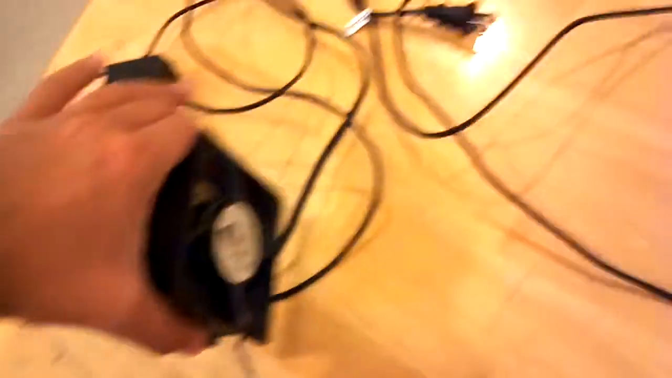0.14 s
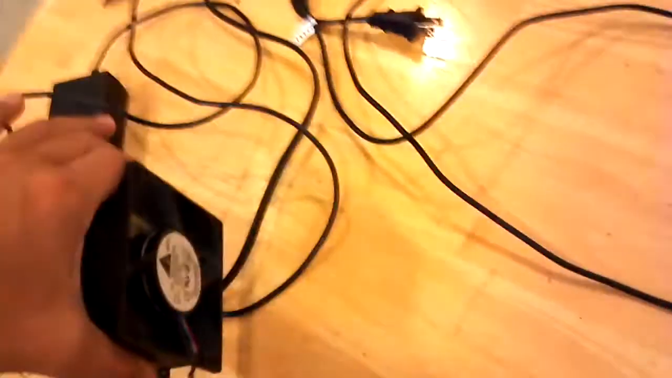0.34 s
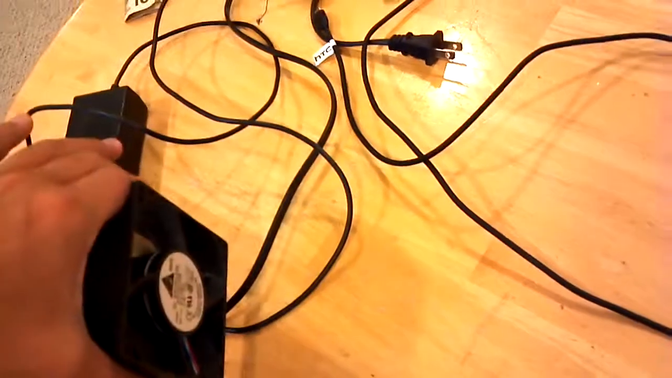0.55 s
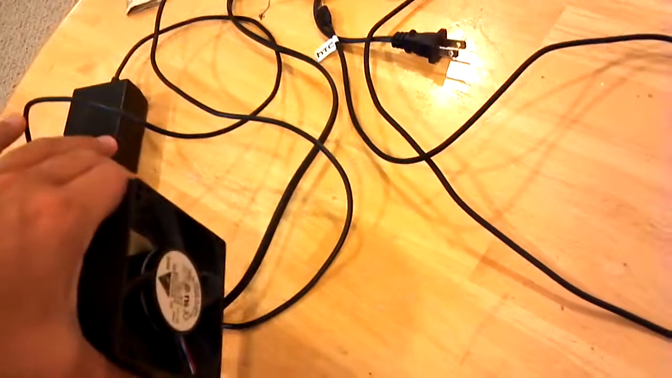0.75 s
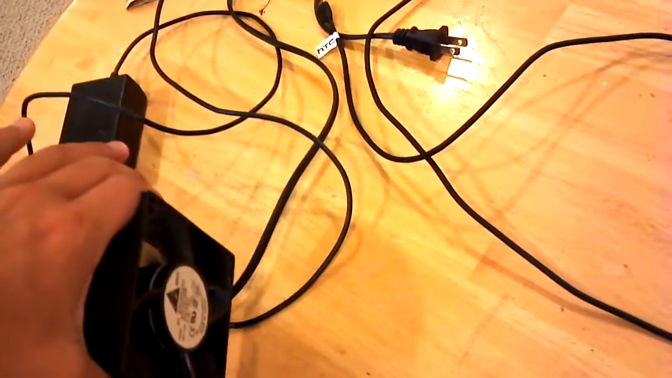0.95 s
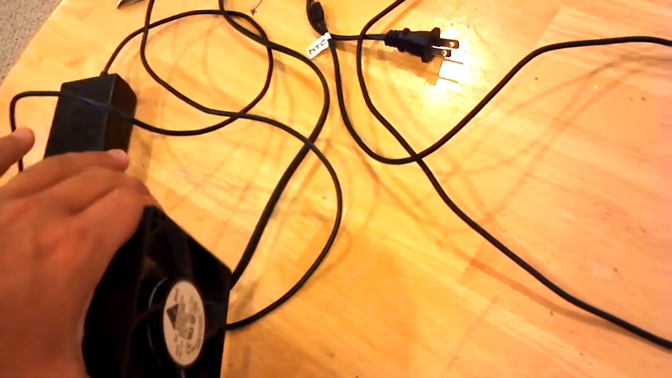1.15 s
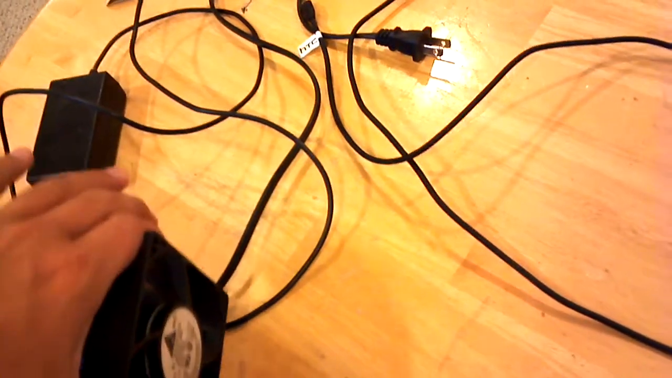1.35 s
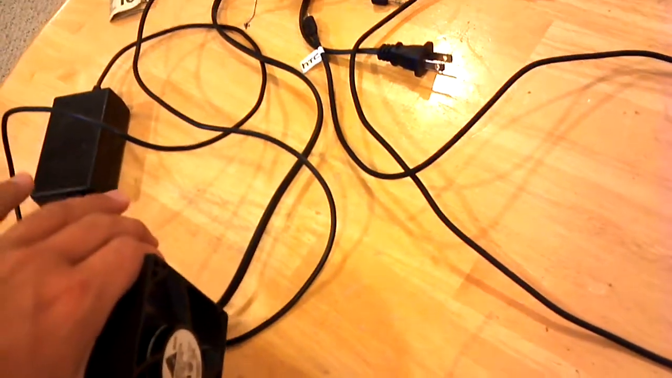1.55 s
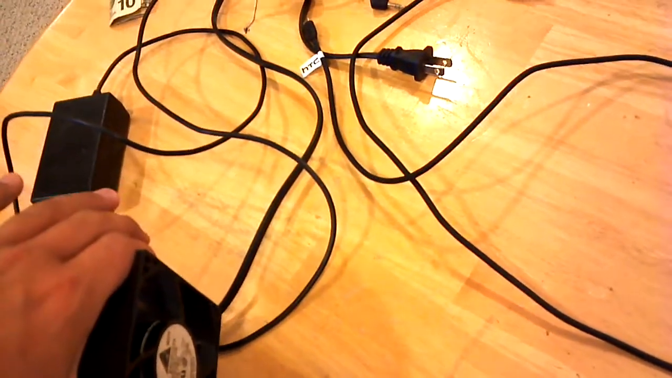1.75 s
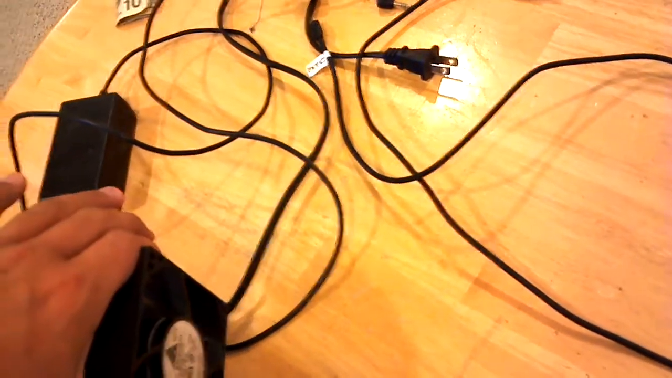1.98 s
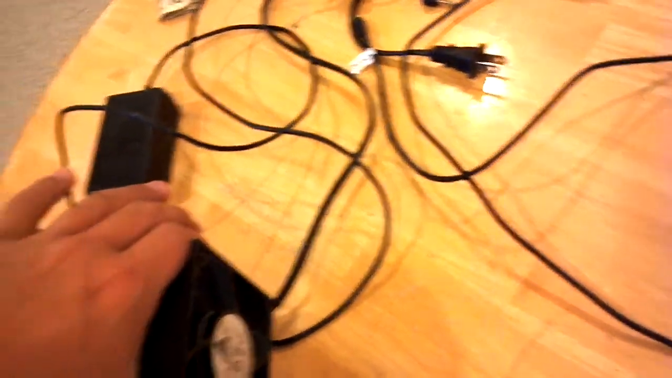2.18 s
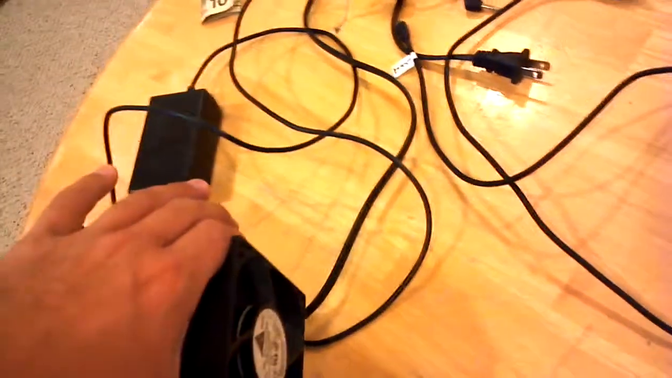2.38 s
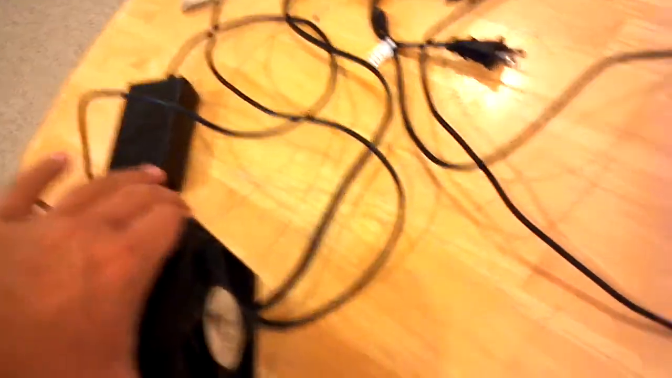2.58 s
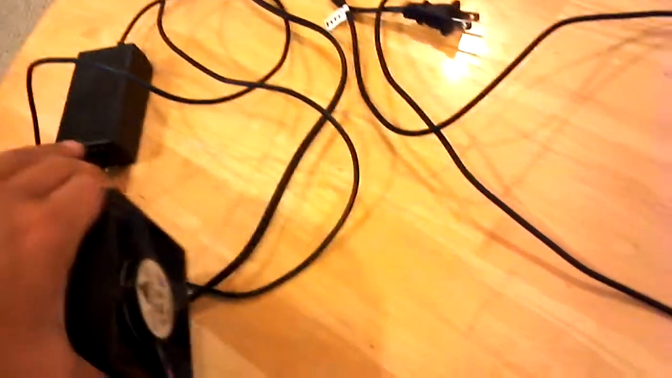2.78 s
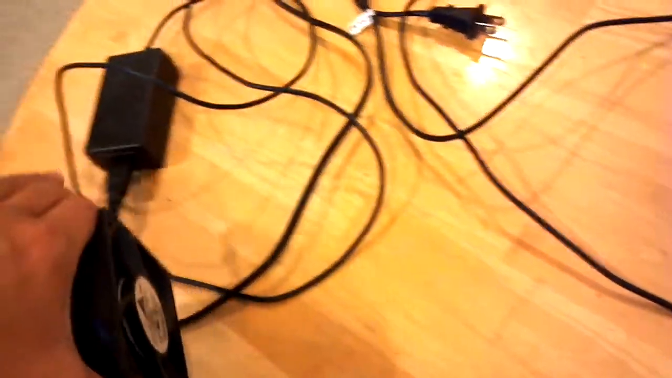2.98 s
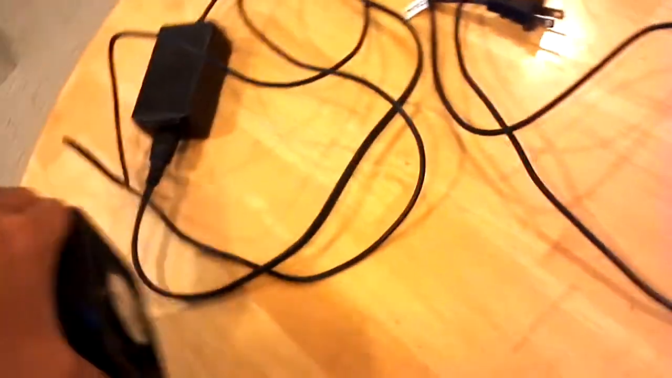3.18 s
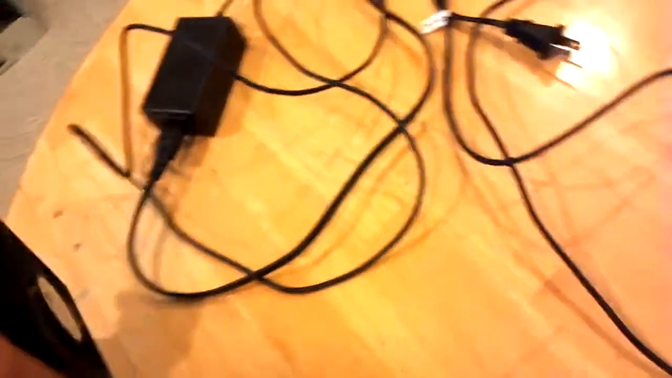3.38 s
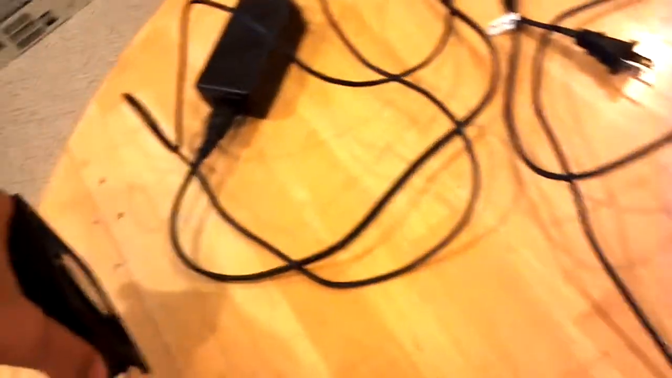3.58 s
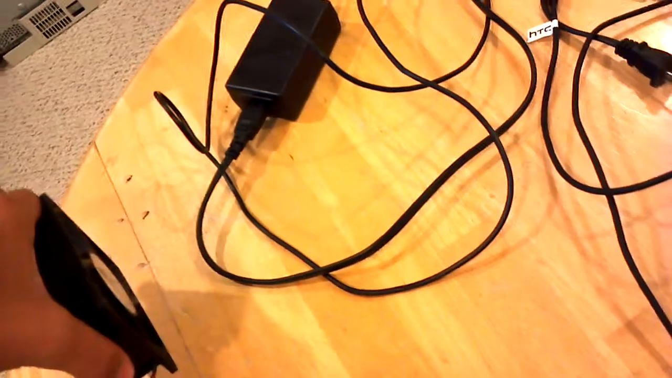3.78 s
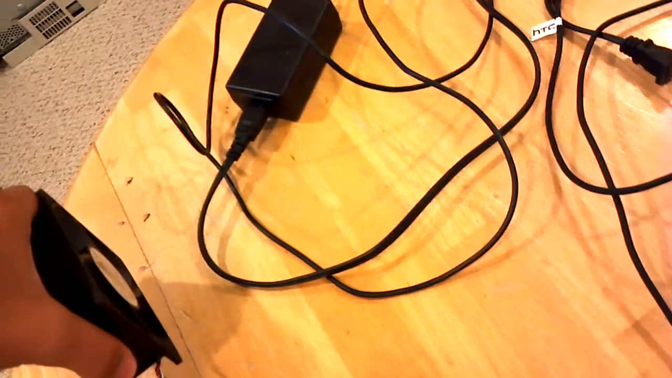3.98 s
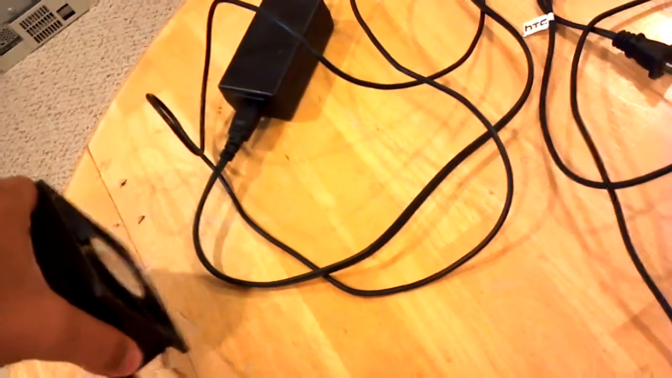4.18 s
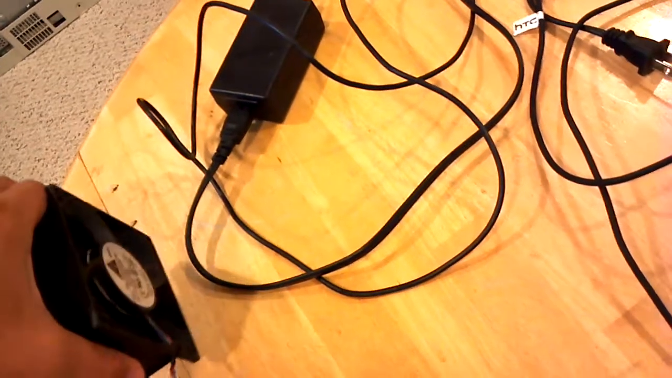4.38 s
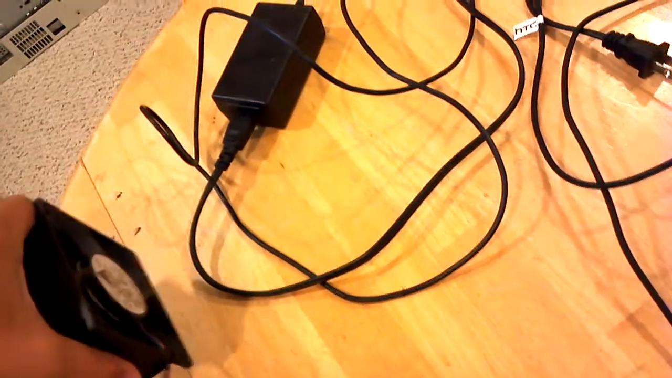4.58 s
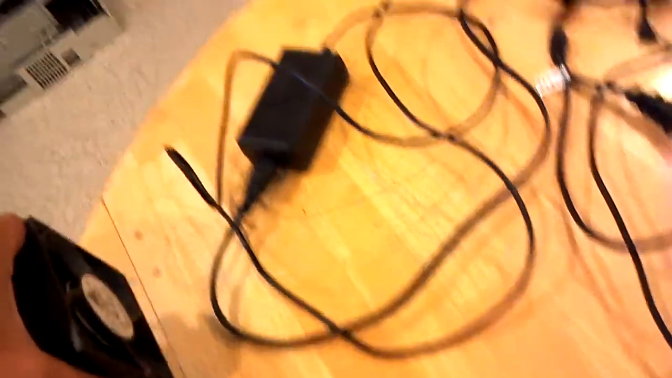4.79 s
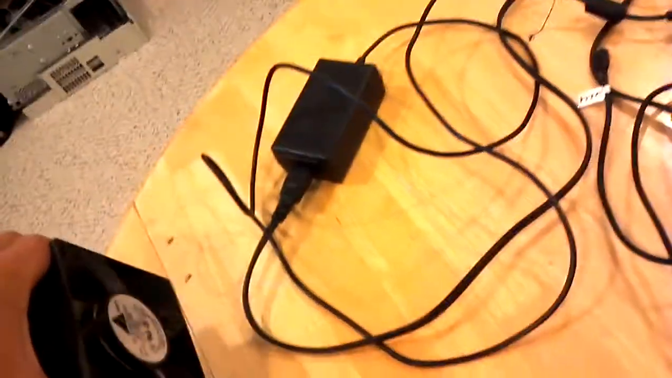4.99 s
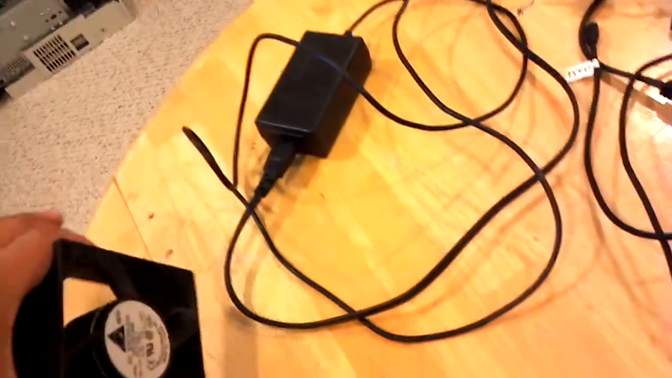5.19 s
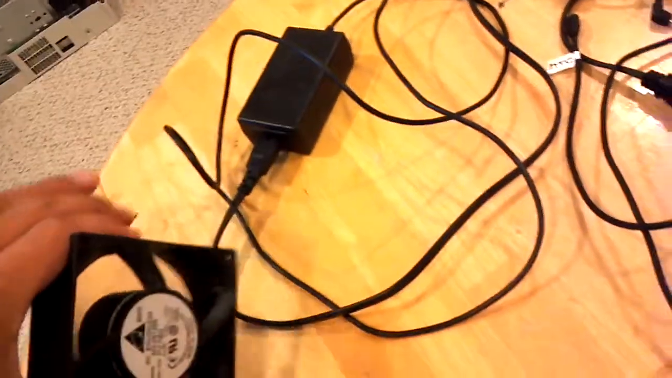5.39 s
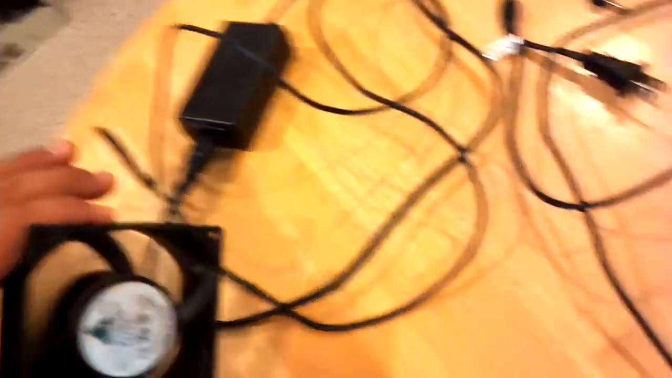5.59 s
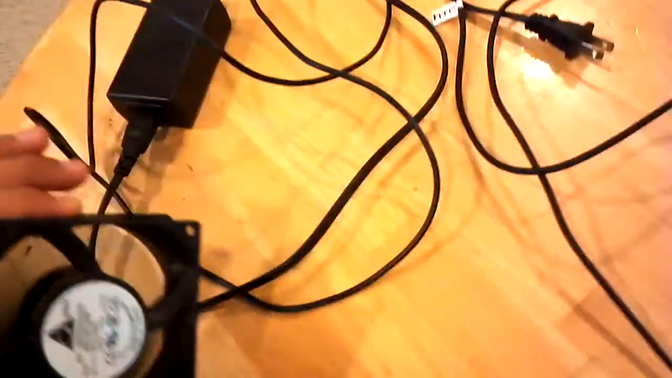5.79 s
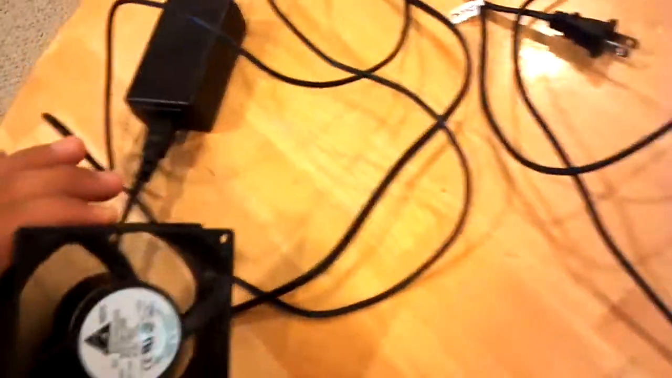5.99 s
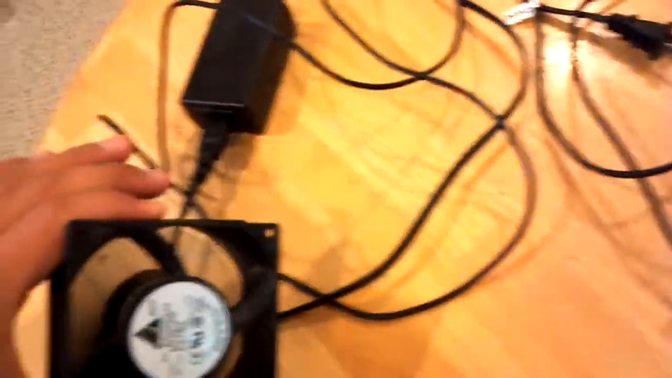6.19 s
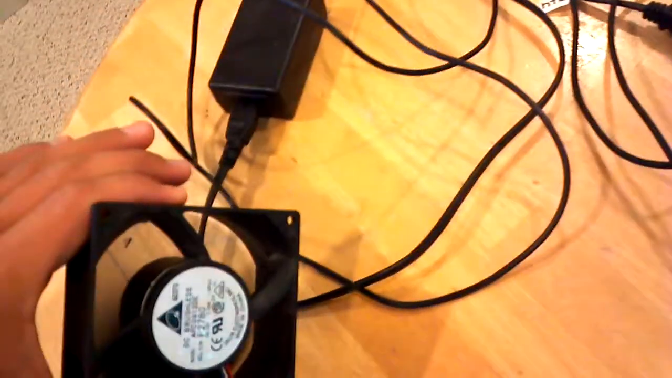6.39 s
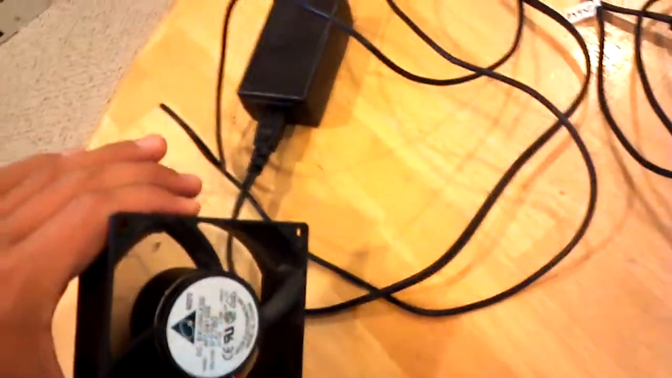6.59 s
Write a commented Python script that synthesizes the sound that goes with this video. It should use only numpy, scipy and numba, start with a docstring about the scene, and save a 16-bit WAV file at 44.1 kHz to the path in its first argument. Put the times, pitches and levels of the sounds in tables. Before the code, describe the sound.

A small electric cooling fan, held close to the microphone in a quiet room, is spinning up from the start. A soft rush of air and a humming whine climb steadily in pitch and loudness. In the first half second there is a very faint, very high rising electronic whistle and one tiny plastic tick. The fan's tones swell and dip as they rise, reaching full speed at about 3.5 seconds, then holding a high, wavering whine over strong rushing air. From about 3 seconds a thin, narrow hiss joins, leaning left. At about 5.7 seconds the fan is turned and its airflow strikes the microphone, bringing irregular gusts of low rumble, dull slaps and sharp crackle. This buffeting is the loudest part, thickening from 6 seconds and pushing the fan's whine down in level, and it continues until the end at about 6.6 seconds.

```python
"""A small nine-blade cooling fan, hand-held over a table, spins up with a faint rising coil whine
and one plastic tick. Over rushing air its tones swell and dip as they climb through resonances, then
waver at full speed; from about 3 s a narrow hiss beams at the recorder's left port. At 5.7 s the fan
is turned so that its jet buffets that port with rumble, slaps and crackle, and the gain control ducks.
Throughout, the recorder widens its stereo by subtracting from each port a late copy of the other."""
import sys
import numpy as np
from scipy import signal
from scipy.fft import rfft, irfft, next_fast_len
from scipy.io import wavfile
from scipy.ndimage import uniform_filter1d
from numba import njit

SR = 44100
rng = np.random.default_rng(int(sys.argv[2]) if len(sys.argv) > 2 else 0)


def store_pcm(level_fs):
    """Save levels as 16-bit WAV."""
    pcm = np.round(np.clip(level_fs, -1, 1) * 32767).astype(np.int16)
    wavfile.write(sys.argv[1], SR, np.atleast_2d(pcm).T)


N = 293265

# path from fan to ports: (frequency [Hz], left minus right [dB], left lead [rad], likeness [0-1])
PORT_PATH = [(60, 0.5, 0.023, 0.79), (475, -4, 0.198, 0.98), (1000, -8, 0.81, 0.77),
             (1430, -5.5, 1.38, 0.1), (1685, -5, 3.53, 0.07), (2675, -2, 2.84, 1), (2920, 3, 6.63, 0.31),
             (4230, 3, 10.17, 0.06), (7100, 7.5, 13.95, 0.32), (16100, 4.5, 21, 0)]
# room tone colour: (frequency [Hz], level [dB])
ROOM_EQ = [(60, -17.5), (120, -1), (300, -1), (700, -42), (1100, -3.5), (2500, -11), (6000, -43),
           (16000, -30)]
# plastic tick: (time [s], level [dB], modes (frequency [Hz], level [dB], t60 [s]))
FRAME_TICK = (.3153, -42, [(3900, -5, .008), (5100, -4, .008), (9600, -6, .008)])
# fader of the narrow hiss: (time [s], level [dB])
HISS_FADER = [(2.7, -58), (3.1, -42.5), (3.45, -33.5), (4.1, -33.5), (4.65, -32), (4.95, -36), (5.4, -41.5),
              (5.7, -33)]
# glide of the drive coil: (time [s], pitch [Hz], level [dB])
COIL_GLIDE = [(0, 12150, -69), (.2, 12600, -68), (.35, 13400, -65), (.47, 14400, -62), (.53, 15150, -59),
              (.58, 15900, -64), (.64, 16800, -68)]
# the drive ramps the shaft up, then it settles: (time [s], shaft speed [Hz])
SPIN_UP = [(0, 49.5), (.5, 56.4), (1.0, 64.1), (2.0, 79.8), (3.0, 95.85), (3.3, 100.1), (3.55, 101.4),
           (3.9, 101.55), (4.4, 101.7), (4.8, 101.95), (5.3, 102.1), (5.65, 102.5)]
# the hand turns the fan: (time [s], blade tone left minus right [dB], lift [dB], treble tilt [dB/octave])
HAND_TURN = [(0, -2.5, -1.5, 1), (.45, -1.5, -1, -0.5), (1.0, -5, 0, 0), (1.45, -2, -0.5, 0),
             (2.0, -6, 0.4, 0), (2.5, -4, 0.9, 0), (3.1, -2, 0.6, 0), (3.5, -5.5, 0.15, -0.45),
             (4.1, -22, 0.35, -0.5), (4.9, -16.5, 0.5, -0.4), (5.35, -12, 0.7, 1.15),
             (5.65, -11, 1.5, 0.38)]
# air rush colour: (frequency [Hz], level [dB])
AIR_EQ = [(60, -22), (120, -5.5), (300, -2.5), (700, -4.5), (1100, -1.5), (2000, -3.5), (3000, -7.5),
          (6000, -11), (9000, -14), (16000, -19.5)]
# resonances of the frame: (frequency [Hz], width [Hz], boost [dB])
FRAME_PEAKS = [(1420, 200, 3), (3160, 260, 4.5), (3690, 170, 5.5), (4090, 140, 4), (4650, 280, 8),
               (4970, 200, 4)]
# the tones swell and dip as they climb through resonances, then waver at full speed;
# levels over the air: (time [s], blade tone [dB], its octave [dB], motor tone [dB])
WHINE_SWELLS = [(0, 6, -2.5, -23.5), (.65, -3.5, -13, -23.5), (.9, -5, -1, -21.5), (1.5, -11, -10.5, -25),
                (1.7, -6, -8, -13.5), (2.02, -13, -10, -11), (2.14, -33, -8, -9.5), (2.27, -7, -9, -7),
                (2.42, -11.5, -9.5, -7), (2.55, -10.5, -5, -21), (2.85, -17, -5.5, -14.5),
                (2.95, -6.5, -3.5, -21), (3.02, -1, 0, -24), (3.11, 1, -3.5, -19), (3.21, -4.5, -6, -16),
                (3.32, -1, -3, -17), (3.42, -8, -3, -12), (3.5, -5, -1, -12), (3.57, -9.5, -1.5, -12.5),
                (3.89, -3, -5.5, -15.5), (4.15, -10, -4.5, -13), (4.39, -4.5, 1.5, -18),
                (4.52, 1, -0.5, -10.5), (4.7, -1.2, -0.8, -16), (4.9, -8, -5, -10.5),
                (5.12, -4.5, -8, -9.5), (5.28, 1, -3.5, -9), (5.38, 1, 6, -9), (5.54, -6.5, -3.5, -10),
                (5.65, -9, -9, -11)]
# weak overtones from uneven blades:
# (shaft multiple, level over the air at full speed [dB], change with speed [dB/octave], left bias [dB])
SHAFT_TONES = [(3, -27, 0, -2), (5, -20.5, -3, -2), (8, -24, -14, -3), (10, -25, 0, -6), (11, -21, 8, -6),
               (13, -23, 6, -5), (14, -20, 12, -4), (24, -22, 15, -3), (31, -31, 0, 4), (36, -24, 0, 8),
               (40, -29, 0, 6), (45, -28, -7, 7)]
# higher motor tones: (shaft multiple, level over the air at the hub's resonance [dB])
HUB_TONES = [(16, -11), (20, -8.5)]
# gusts on the left port: (peak time [s], rumble level [dB], time to fall 6 dB, sign ignored [s])
JET_GUSTS = [(5.703, 8.5, 0.0067), (5.713, 3, 0.0072), (5.724, 0.5, 0.0057), (5.765, 6, 0.0087),
             (5.776, 1, 0.009), (5.788, -10, -0.02), (5.806, -15, -0.03), (5.844, -2, 0),
             (5.856, 5.5, 0.011), (5.869, 1, 0.0047), (5.881, -1, -0.0057), (5.897, -10, -0.0245),
             (5.914, -16, -0.03), (5.942, 1, 0.0032), (5.956, 15.5, 0.0047), (5.975, 9, 0.0056),
             (5.997, 4.5, 0.0064), (6.023, 6, 0.0075), (6.053, 10, 0.009), (6.075, 10, 0.0109),
             (6.101, 5, 0.014), (6.121, 9, 0.0092), (6.133, 11, 0.0125), (6.158, 8.5, 0.01),
             (6.172, 9, 0.016), (6.198, 2, 0.008), (6.211, 8.5, 0.012), (6.224, 9, 0.0178),
             (6.242, 8, 0.0086), (6.266, 0, 0.007), (6.284, 9.5, 0.0168), (6.309, 6, 0.0103),
             (6.335, 6, 0.01), (6.349, 4, 0.02), (6.375, 13.5, 0.022), (6.423, 7, 0.007), (6.437, 6, 0.003),
             (6.449, 12, 0.0172), (6.464, 4, 0.005), (6.478, 9.5, 0.0168), (6.502, 6.5, 0.0029),
             (6.515, 6.5, 0.0157), (6.535, -1, 0.014), (6.574, 6, 0.0155), (6.603, 7, 0.0259),
             (6.624, 10.5, 0.03)]
# the jet's edge strikes the membrane: (time [s], level [dB], pitch [Hz])
JET_SLAPS = [(5.6955, 15.5, 250), (5.9515, 23.5, 210), (6.0715, 19, 190), (6.4465, 18, 190)]
# single sharp pressure steps at the height of the gusts: (time [s], level [dB])
JET_CRACKS = [(5.761, 10), (5.851, 7), (5.940, 11), (5.952, 22.5), (5.965, 16), (5.975, 18.5), (6.020, 15),
              (6.073, 18), (6.083, 19), (6.092, 19), (6.120, 23), (6.135, 21), (6.157, 24.5), (6.171, 19),
              (6.210, 20), (6.219, 20), (6.236, 18), (6.241, 22), (6.290, 21.5), (6.309, 21), (6.333, 22),
              (6.340, 20), (6.347, 21.5), (6.368, 19), (6.377, 25), (6.420, 9), (6.447, 19.5), (6.478, 20),
              (6.485, 10), (6.507, 10), (6.514, 14.5), (6.572, 18.5), (6.595, 15.5), (6.608, 17),
              (6.621, 21)]
# bite of the buffeting: (time [s], crackle trim [dB])
CRACKLE_FADER = [(5.7, -28), (5.76, -12), (5.85, -24), (5.97, -19), (6.07, -22), (6.12, -12.5),
                 (6.3, -14.5), (6.34, -11), (6.38, -14), (6.43, -18.5), (6.52, -23.5), (6.57, -11.5),
                 (6.62, -14.5)]
# colours of the rumble, a pressure step's edge and its body: (frequency [Hz], level [dB])
RUMBLE_EQ = [(40, -44), (70, -14), (110, 4), (200, 0.5), (400, -3), (800, -15), (1400, -31), (3000, -74),
             (16000, -100)]
CRACKLE_EQ = [(200, -10.5), (700, 5), (1400, 5.5), (2500, -4.5), (4500, -21), (7000, -36.5), (16000, -45.5)]
THUMP_EQ = [(60, -21), (200, -2), (500, -0.5), (900, -4.5), (2000, -24.5), (16000, -80)]

ROOM_DB, THUMP_DB = -53.5, 7
HISS_HZ, HISS_WIDTH_HZ = 5820, 300
BLADES, MOTOR_ORDER = 9, 12  # pulses per turn
HUB_HZ, HUB_WIDTH_HZ = 970, 580
AIR_DB, AIR_DB_PER_OCTAVE = -27, 29  # base level for air and tones at full speed; growth with speed
THIRD_DB, THIRD_DB_PER_OCTAVE = -22, -25  # third blade harmonic over the air; change with speed
GUST_RISE = 0.53  # rise time as a share of fall time
JET_SPAN_S, JET_DB, JET_FLUTTER_DB = (5.85, 6.03), (-25.5, -8.5), 2.5  # steady buffeting fades in
CROSS_LAG_SAMPLES, LOW_CUT_HZ, HIGH_CUT_HZ = 17, 75, 15720
TIME = np.arange(N) / SR


def undb(db):
    """dB to gain."""
    return 10 ** (np.asarray(db) / 20)


def unit(x):
    """Scale to rms 1."""
    return x / np.sqrt(np.mean(x ** 2))


def pan_left(right_db):
    """Stereo gains that turn the right side down."""
    return undb([[0], [right_db]])


def lanes(table, **ends):
    """One automation curve for each column after the time."""
    times, *columns = np.transpose(table)
    return [np.interp(TIME, times, column, **ends) for column in columns]


def on_log(table, hz, column=1):
    """Read a table on a log-frequency axis."""
    table = np.array(table)
    return np.interp(np.log(np.maximum(hz, 1)), np.log(table[:, 0]), table[:, column])


def wobble(rate_hz):
    """Smooth random modulation with a spread near 1."""
    hold = int(SR / rate_hz)
    levels = np.repeat(rng.standard_normal(N // hold + 1), hold)
    return 1.42 * uniform_filter1d(uniform_filter1d(levels, hold), hold)[:N]


def equalize(x, table):
    """Minimum-phase EQ, so attacks stay sharp; white noise keeps its level."""
    size = 4096
    cepstrum = irfft(np.log(undb(on_log(table, np.arange(size // 2 + 1) * SR / size))))
    cepstrum[1:size // 2] *= 2
    cepstrum[size // 2 + 1:] = 0
    response = irfft(np.exp(rfft(cepstrum)))
    return signal.fftconvolve(x, response / np.sqrt(np.sum(response ** 2)))[:N]


def port_noise(colour_db, band_db):
    """Noise partly shared by the ports; band_db(centre Hz) rides each half-octave band in time."""
    size = next_fast_len(N)
    hz = np.arange(size // 2 + 1) * SR / size
    right, own = rfft(rng.standard_normal((2, size))) * undb(colour_db(hz))
    likeness = np.clip(on_log(PORT_PATH, hz, column=3), 0, 1)
    lead = on_log(PORT_PATH, hz, column=2)
    left = likeness * right * np.exp(1j * lead) + np.sqrt(1 - likeness ** 2) * own
    both = np.array([left * undb(on_log(PORT_PATH, hz)), right]) / np.std(irfft(right))
    half_octaves = 2 * np.log2(np.maximum(hz, 1) / 45)
    out = 0
    for band in range(18):
        window = np.cos(np.pi / 2 * np.clip(half_octaves - band, -1, 1)) ** 2
        out = out + irfft(both * window, size)[:, :N] * undb(band_db(45 * 2 ** (band / 2)))
    return out


def room_tone():
    """A quiet, low bed of noise whose bands drift gently."""
    return undb(ROOM_DB) * port_noise(lambda hz: on_log(ROOM_EQ, hz), lambda hz: wobble(5.77))


def frame_tick():
    """The plastic frame ticks once in fast-dying modes."""
    start, level_db, modes = FRAME_TICK
    age = np.maximum(TIME - start, 0)
    ring = sum(undb(db - 60 * age / t60) * np.sin(2 * np.pi * hz * age) for hz, db, t60 in modes)
    return undb(level_db) * ring * pan_left(-4)


def coil_whine(shaft_hz):
    """The drive coil sings briefly at the start, throbbing four times a turn."""
    hz, db = lanes(COIL_GLIDE)
    db[TIME > COIL_GLIDE[-1][0]] = -200
    throb = 1 + 0.58 * np.sin(2 * np.pi * np.cumsum(4 * shaft_hz) / SR)
    whine = np.sin(2 * np.pi * np.cumsum(hz) / SR + 1.3 * wobble(600))
    return undb(db) * throb * whine * pan_left(-14)


def beamed_hiss():
    """Noise in one sharp resonance beams at the left port while the fan points its way."""
    peak = signal.iirpeak(HISS_HZ, HISS_HZ / HISS_WIDTH_HZ, fs=SR)
    hiss = unit(signal.lfilter(*peak, signal.lfilter(*peak, rng.standard_normal((2, N)))))
    db, = lanes(HISS_FADER, left=-200)
    return hiss * undb(db + 0.71 * wobble(10)) * pan_left(-11)


def frame_db(hz):
    """Boost from the frame's resonances."""
    return sum(db / (1 + (2 * (hz - centre) / width) ** 2) for centre, width, db in FRAME_PEAKS)


def air_rush(speed_octaves, air_db, treble_tilt):
    """Turbulence off the blades, coloured by the frame; treble grows faster with speed than bass."""
    swell_db = .4 * wobble(3)

    def band_db(hz):
        turn_db = treble_tilt * max(np.log2(hz / 2500), 0)
        speed_db = 2.07 * speed_octaves * np.log2(hz / 4000)
        return air_db + turn_db + speed_db + swell_db + 0.792 * wobble(12)
    return undb(-1) * port_noise(lambda hz: on_log(AIR_EQ, hz) + frame_db(hz), band_db)


def tone(hz, db, left_db=None, lead_rad=None, flutter_db=1.88, smear_rad=0.4):
    """One partial at both ports; gusty inflow shakes its level and phase."""
    phase = 2 * np.pi * (np.cumsum(hz) / SR + rng.random()) + smear_rad * wobble(45)
    gain = np.sqrt(2) * undb(db + flutter_db * wobble(25.973))
    if left_db is None:
        left_db = on_log(PORT_PATH, hz)
    if lead_rad is None:
        lead_rad = on_log(PORT_PATH, hz, column=2)
    left = undb(left_db) * np.sin(phase + lead_rad + 0.34 * wobble(4.083))
    return gain * np.array([left, np.sin(phase)])


def rotor_whine(shaft_hz, speed_octaves, air_db, blade_left_db):
    """Three blade harmonics, the motor tone and weaker overtones, all locked to the shaft."""
    blade_db, octave_db, motor_db = lanes(WHINE_SWELLS)
    blade_hz = BLADES * shaft_hz
    out = tone(blade_hz, air_db + blade_db, blade_left_db, flutter_db=1.4)
    out += tone(2 * blade_hz, air_db + octave_db)
    out += tone(3 * blade_hz, air_db + THIRD_DB + THIRD_DB_PER_OCTAVE * speed_octaves, flutter_db=3.5)
    out += tone(MOTOR_ORDER * shaft_hz, air_db + motor_db,
                left_db=-5.5, lead_rad=0.4, flutter_db=1.5, smear_rad=0.1)
    for multiple, db, db_per_octave, left_db in SHAFT_TONES:
        hz = multiple * shaft_hz
        level_db = air_db + db + db_per_octave * speed_octaves + frame_db(hz)
        out += tone(hz, level_db, left_db, flutter_db=3, smear_rad=.013 * multiple)
    for multiple, db in HUB_TONES:  # these bloom as they sweep through the hub's resonance
        hz = multiple * shaft_hz
        detune = 2 * (hz - HUB_HZ) / HUB_WIDTH_HZ
        out += tone(hz, air_db + db, flutter_db=2.5, smear_rad=0.26) / (1 + detune ** 2)
    return out


def fan():
    """Shaft speed drives pitch and loudness; turning the fan shifts pan, level and brightness."""
    shaft_hz, = lanes(SPIN_UP)
    blade_left_db, lift_db, treble_tilt = lanes(HAND_TURN)
    speed_octaves = np.log2(shaft_hz / shaft_hz.max())  # 0 at full speed
    air_db = AIR_DB + AIR_DB_PER_OCTAVE * speed_octaves + lift_db
    rush = air_rush(speed_octaves, air_db, treble_tilt)
    return rush + rotor_whine(shaft_hz, speed_octaves, air_db, blade_left_db) + coil_whine(shaft_hz)


def membrane_slaps(rumble):
    """Each slap is a low thud; the rumble is muted under it so that the thud sets the ducking."""
    for start, db, hz in JET_SLAPS:
        mute = 1 - np.exp(-((TIME - start - .002) / .005) ** 2)
        cycles = np.maximum(TIME - start, 0) * hz
        envelope = np.minimum(3 * cycles, 1) * np.exp(-cycles / 1.2)
        rumble = rumble * mute - undb(db) * np.sin(2 * np.pi * cycles) * envelope
    return rumble


def jet_buffeting():
    """The fan's eddies burst on the left membrane: saturated rumble plus sharp pressure steps."""
    steady_db = np.interp(TIME, JET_SPAN_S, JET_DB, left=-200) + JET_FLUTTER_DB * wobble(60)
    rumble_power = undb(steady_db) ** 2
    crackle_power = rumble_power.copy()
    for peak, db, fall in JET_GUSTS:
        sag_db = 6 * ((TIME - peak) / np.where(TIME < peak, GUST_RISE * fall, fall)) ** 2
        rumble_power += undb(db - sag_db) ** 2
        crackle_power += undb(db - 2 * sag_db) ** 2  # crackle hugs the crest of each gust
    chance, polarity, strength = rng.random((3, N))
    steps = unit((chance < 450 / SR) * np.sign(polarity - .5) * undb(12 * strength))  # about 450 a second
    eddies = equalize(0.84 * steps + 0.9 * rng.standard_normal(N), RUMBLE_EQ)
    rumble = 1.7 * np.tanh(eddies / 1.2) * np.sqrt(rumble_power)
    trim_db, = lanes(CRACKLE_FADER)
    crackle = steps * np.sqrt(crackle_power) * undb(trim_db + 1.5)
    crack_s, crack_db = np.transpose(JET_CRACKS)
    cracks = np.zeros(N)
    cracks[(crack_s * SR).astype(int)] = undb(crack_db) * np.sign(rng.standard_normal(len(crack_s)))
    bite = equalize(crackle + cracks, CRACKLE_EQ)
    thump = undb(THUMP_DB) * equalize(cracks, THUMP_EQ)
    return (membrane_slaps(rumble) + bite + thump) * pan_left(-30)


def scene():
    """The mix at the left and right port."""
    return room_tone() + fan() + beamed_hiss() + frame_tick() + jet_buffeting()


@njit
def duck(peak, threshold, attack_s, release_s):
    """Gain that drops while the peak envelope is over the threshold."""
    gain, envelope = np.empty(len(peak)), 0.
    for i in range(len(peak)):
        envelope += (peak[i] - envelope) / (SR * (attack_s if peak[i] > envelope else release_s))
        gain[i] = threshold / max(envelope, threshold)
    return gain


def record(dry):
    """Stereo widening, gain control that ducks fast and hardly recovers, then low and high cut."""
    wide = dry - np.pad(dry[::-1], ((0, 0), (CROSS_LAG_SAMPLES, 0)))[:, :N]
    peak_ahead = np.pad(np.abs(wide).max(axis=0), (0, 30))[30:]  # 30 samples of look-ahead
    gain = duck(peak_ahead, threshold=.56, attack_s=.0005, release_s=30)
    low_cut = signal.butter(2, LOW_CUT_HZ, "high", fs=SR, output="sos")
    high_cut = signal.ellip(12, .2, 80, HIGH_CUT_HZ, fs=SR, output="sos")
    return signal.sosfilt(high_cut, signal.sosfilt(low_cut, wide * gain))


dry = scene()
out = record(dry)
store_pcm(out)
```